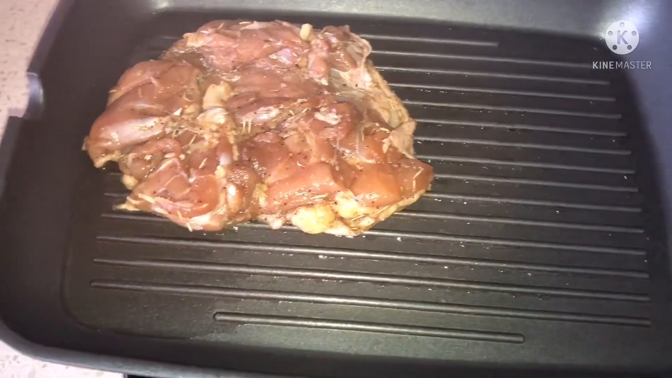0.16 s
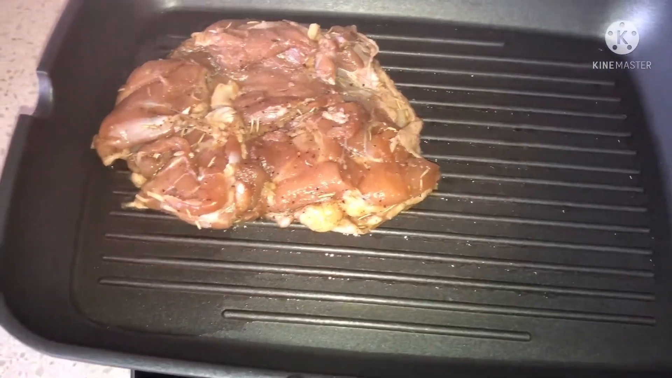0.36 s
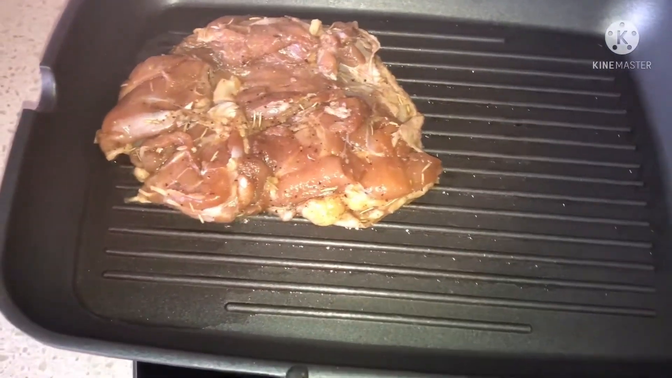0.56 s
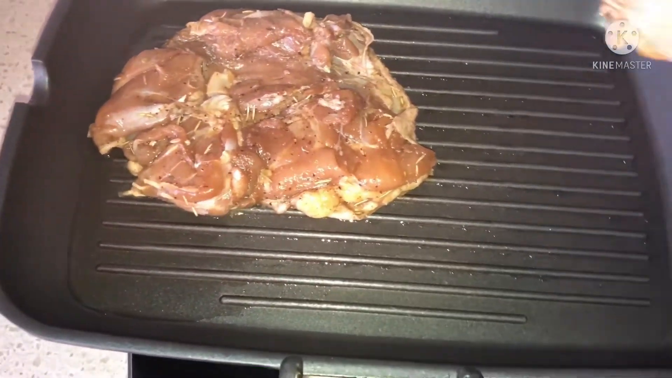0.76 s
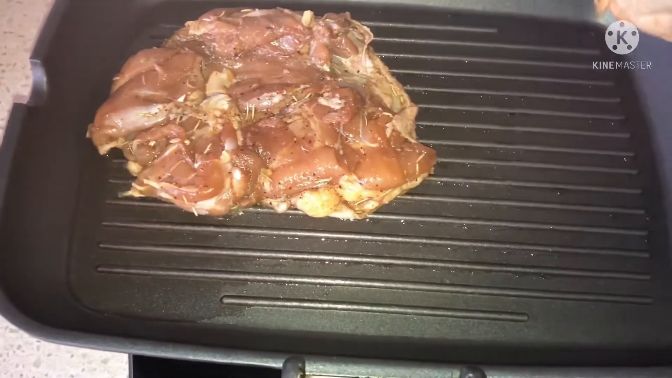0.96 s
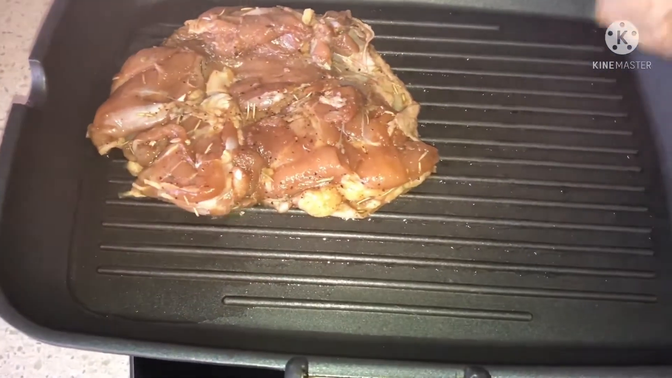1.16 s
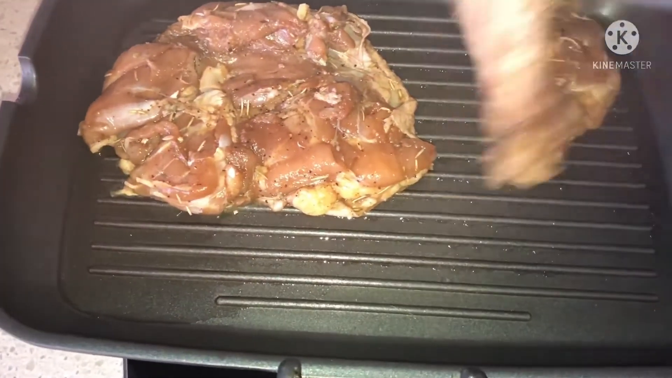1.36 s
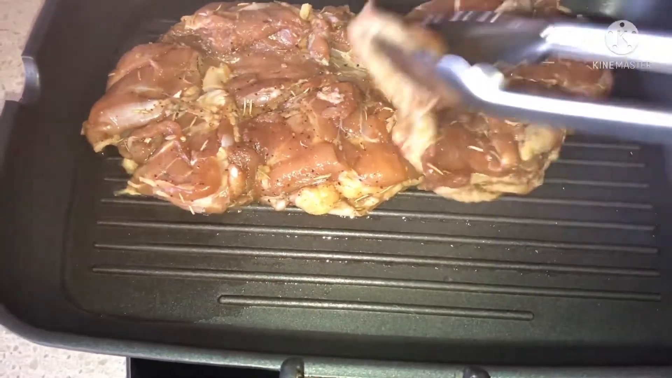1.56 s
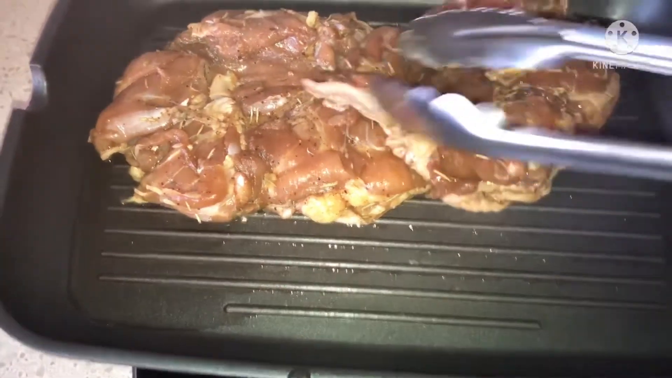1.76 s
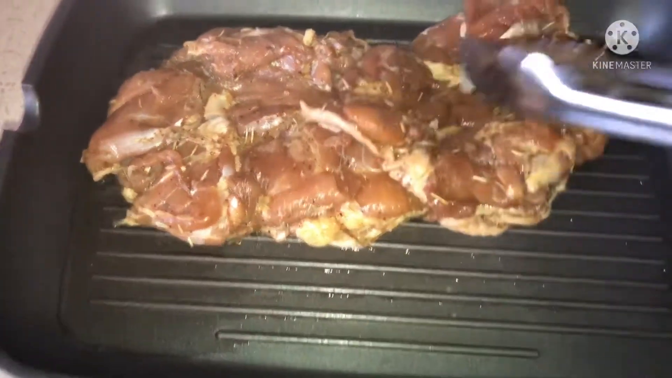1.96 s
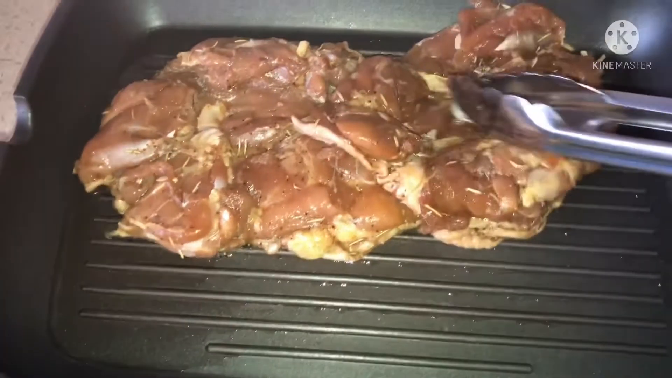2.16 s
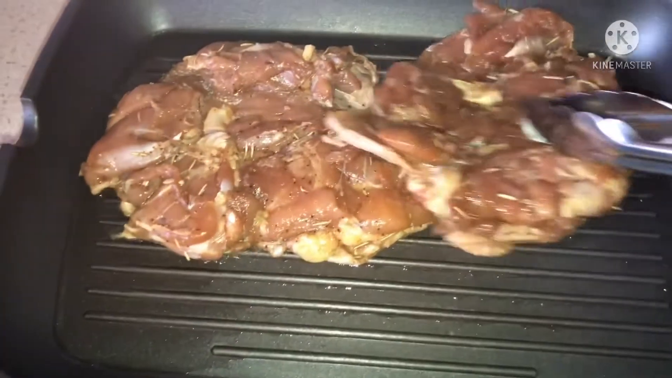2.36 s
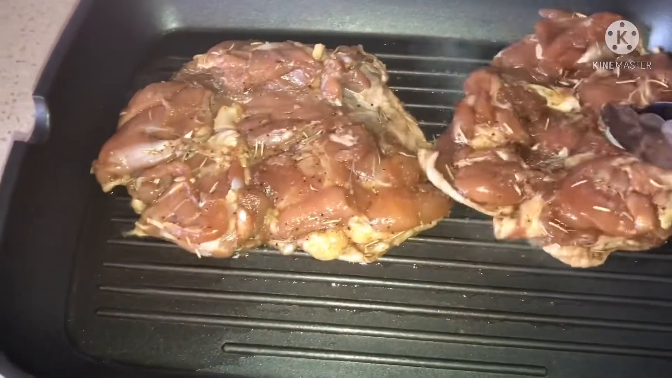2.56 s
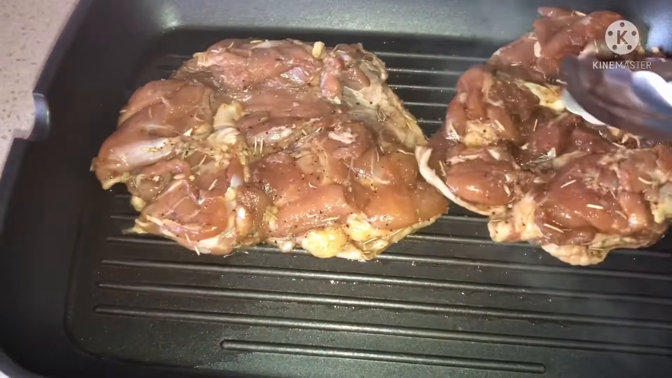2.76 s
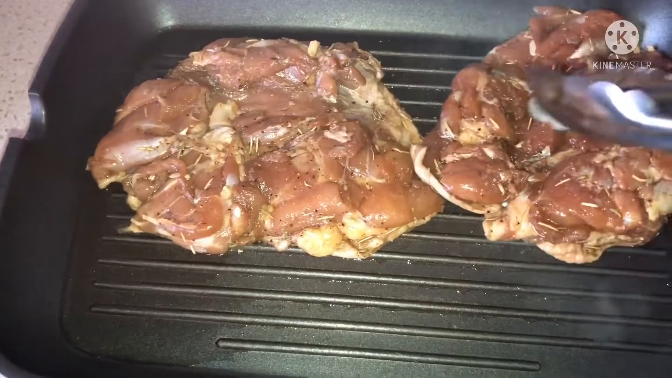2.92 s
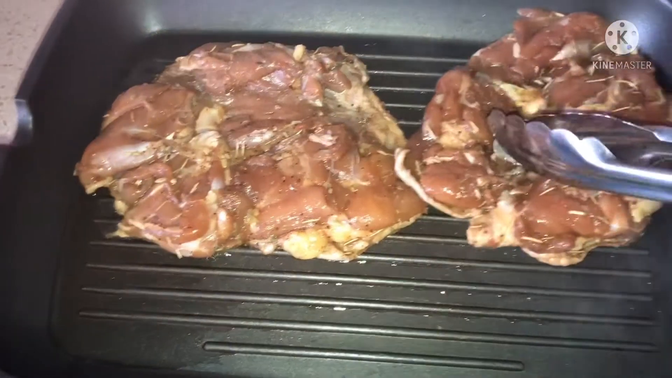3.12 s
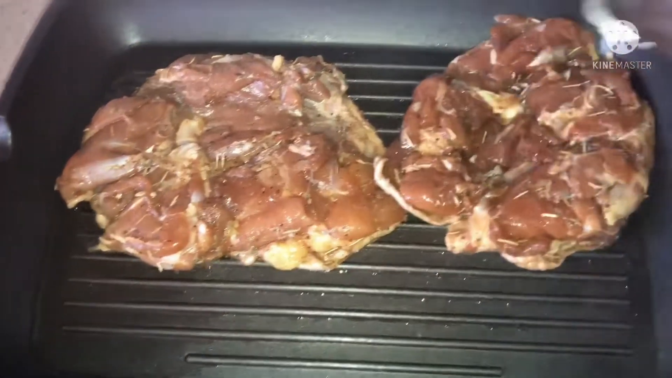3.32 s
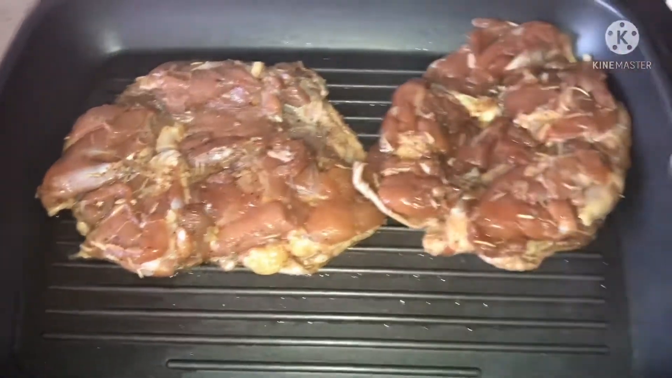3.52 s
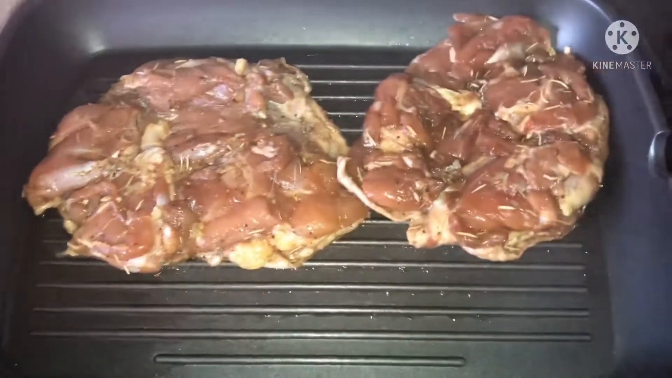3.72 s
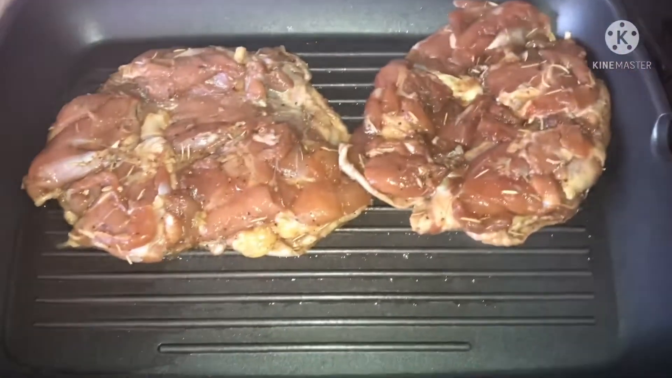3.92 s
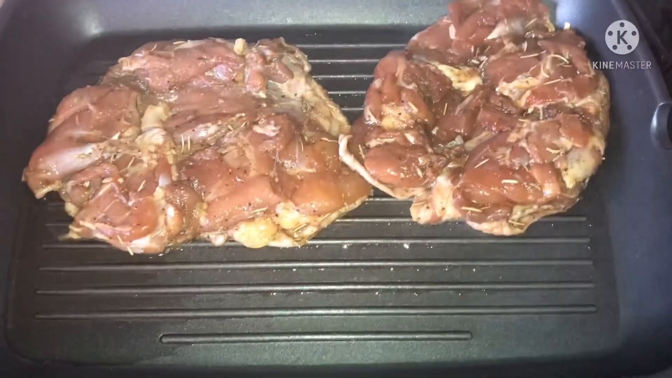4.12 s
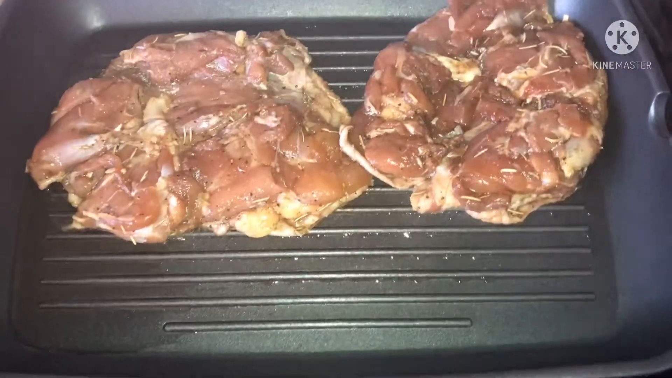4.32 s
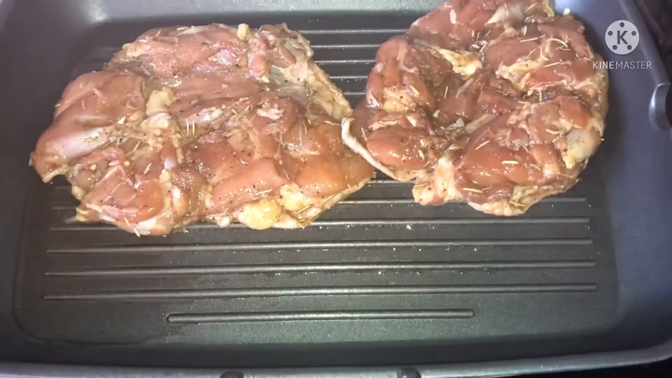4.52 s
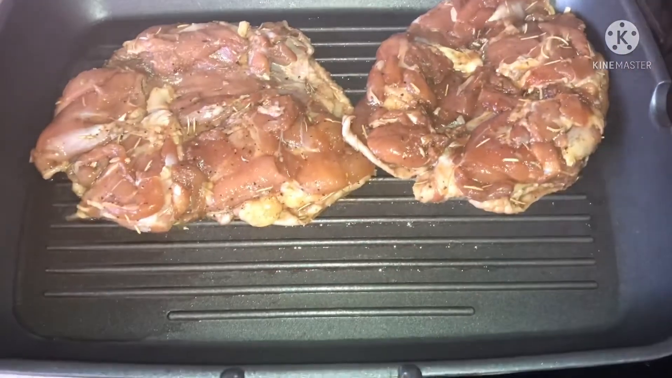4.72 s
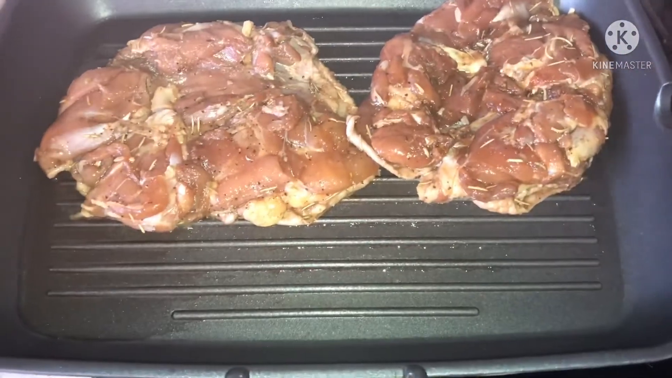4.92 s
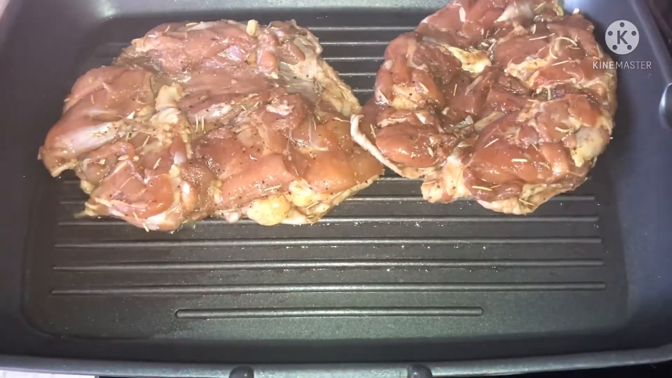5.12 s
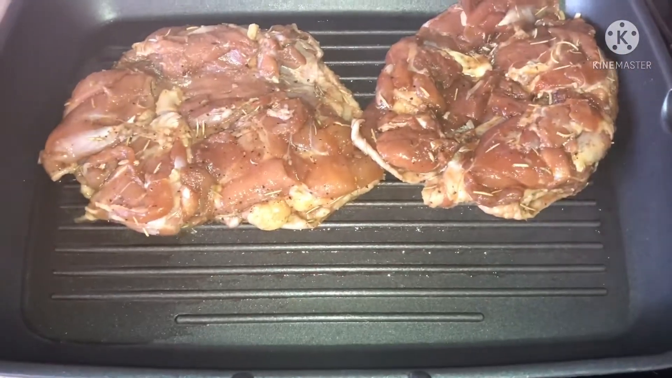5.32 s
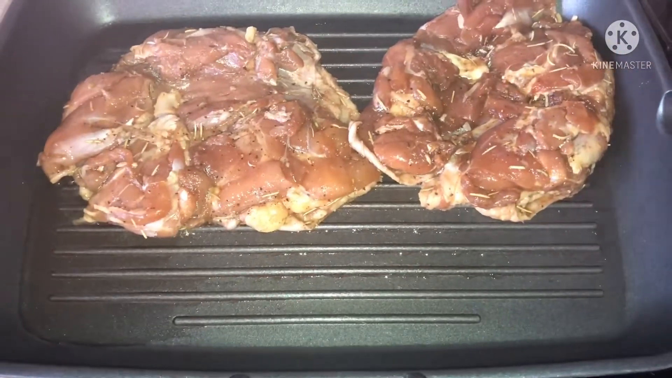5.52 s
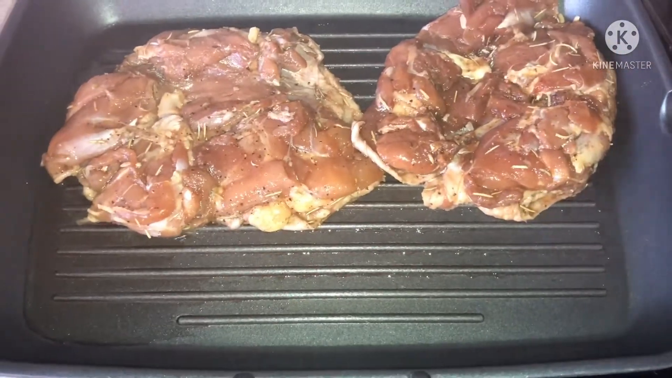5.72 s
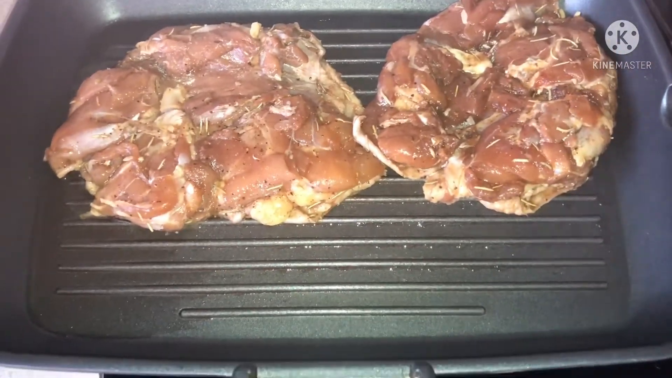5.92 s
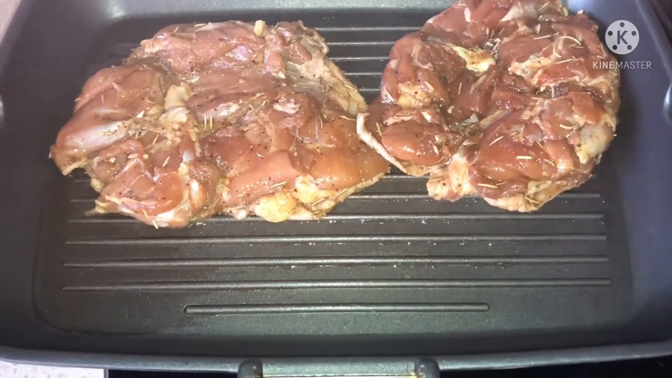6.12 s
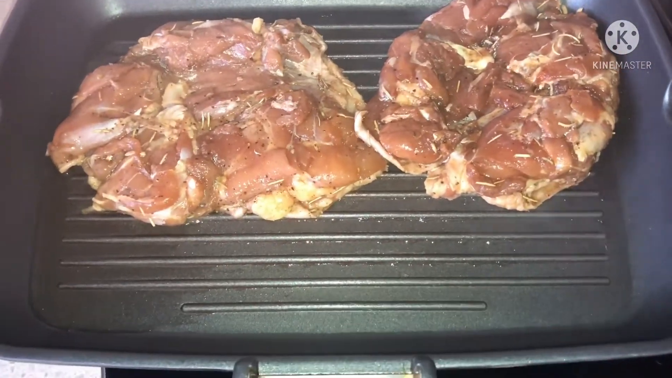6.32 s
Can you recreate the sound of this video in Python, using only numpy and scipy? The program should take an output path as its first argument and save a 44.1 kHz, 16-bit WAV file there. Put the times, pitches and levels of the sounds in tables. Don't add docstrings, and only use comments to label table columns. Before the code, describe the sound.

Meat fries on a ridged metal pan in a kitchen, a bright, dense fizz dotted with sharp fat pops. After about a second another piece is laid in and the sizzle swells markedly, with louder snaps. It surges again midway, then eases slightly but keeps spitting. A low extractor fan hums faintly behind. The microphone is very close above the pan.

```python
import sys
import numpy as np
from scipy import signal
from scipy.fft import rfft, irfft, next_fast_len
from scipy.io import wavfile
from scipy.ndimage import uniform_filter1d, minimum_filter1d

SR = 44100
rng = np.random.default_rng(int(sys.argv[2]) if len(sys.argv) > 2 else 0)


def invert_db(level):
    return 10 ** (np.asarray(level, dtype=float) / 20)


def wav_record(signal):
    frames = np.transpose(np.atleast_2d(signal))
    bounded = np.clip(frames, -1, 1)
    quanta = np.round(bounded * 32767).astype(np.int16)
    wavfile.write(sys.argv[1], SR, quanta)


N = 281358

# pitch_hz, level_db [dB per Hz]
FAN_AIR = [(15, -45), (35, -25), (58, -5.5), (90, -6.5), (170, -9), (200, -12), (400, -10), (700, -10.5),
           (1100, -23.5), (2000, -60)]
# pitch_hz, width_hz, level_db
FAN_TONES = [
    (72.4, 12, -53),
    (115.6, 22, -48.5),
    (155.5, 7.6, -54),
    (223, 13, -62),
    (490, 5, -55),
]
# start_s, peak_db
KNOCK = [
    (0.545, -25),
]
# pitch_hz, level_db, t60_s
KNOCK_MODES = [
    (614, 4, 0.067),
    (758, -1, 0.3),
    (1106, -10, .07),
]
# start_s, peak_db (above 0 the limiter ducks), pitch_hz
POPS = [(0.1128, -5, 10700), (0.212, -1, 9600), (0.2188, 1, 10600), (0.3343, -7, 11200),
        (0.3611, -6, 12100), (0.369, -8, 10700), (0.4678, -4, 6500), (0.476, -2.5, 9500),
        (0.6473, -5, 11200), (0.8542, -9, 10700), (0.875, -4.5, 7600), (0.9892, -2, 11900),
        (1.0716, -3.5, 7460), (1.0763, -2, 11200), (1.1292, -3, 9700), (1.405, 5, 9800),
        (2.0558, 11, 11600), (2.5626, 8, 10400), (2.9495, 6.5, 8400), (3.9392, 6, 8400), (4.0954, 4, 10700),
        (4.2593, 1, 12500), (4.459, 2, 9400), (4.5659, -1, 8500), (4.9333, 5, 10600), (5.265, 0, 6500),
        (5.6655, 3, 8000), (5.9877, 10, 9400), (6.232, 1, 8800), (6.2656, 3.5, 9300)]
# pitch_hz, level_db [dB per Hz]
STEAM = [(250, -28), (450, -25), (600, -12.5), (900, -3), (1400, -2.5), (2400, -3), (3500, -6.5),
         (4500, -9), (5600, -5), (7000, -2), (8800, -1), (11000, -4.5), (13000, -4), (15700, -3.5)]
# pitch_hz, width_hz, level_db (negative: dead spots between modes)
PAN_MODES = [(492, 8, 12), (520, 18, -6), (603.5, 39, 8.5), (672, 29, -9.5), (768, 16, 3), (804, 16, 4.5),
             (830, 33, -4.5), (1138.4, 37, 9.5), (1278, 92, 5), (1944, 260, 5), (2157, 46, -7.5),
             (2620, 720, 5.5), (2830, 120, -1), (4410, 390, -1.5)]
# start_s, vigour_db, looseness [how freely pan and thin spray sound around the fizz]
BOIL = [(0, -26, 1.2), (.35, -24.5, -1.1), (.68, -25.5, 0.24), (1.0, -25, -.8), (1.26, -25, 0),
        (1.33, -20.5, -.5), (1.47, -17, -0.62), (1.9, -17.5, 1.9), (2.2, -18, 1.7), (2.45, -17, 0.3),
        (2.8, -14.5, 0.36), (3.2, -17, 0.96), (3.55, -17, -0.086), (3.85, -18, -0.21), (4.12, -19, 0.19),
        (4.7, -19, -0.67), (5.5, -20, -0.39), (6.38, -19.5, 0.35)]
# level_db [against the vigour], loose_db [per looseness], lag_s, fade_db [per s]
REGIONS = [
    (-17, 0.5, .35, 0),
    (-7, 1, 0.032, 0),
    (-10.5, -0.2, .01, 0),
    (-0.72, 0, .002, 0),
    (.3, 0.4, .01, 0.56),
]
# start_s, length_s, pitch_hz, gain_db
POCKETS = [(.06, 0.18, 3180, 7.5), (0.0, 1.5, 4300, 4.5), (0, 1.05, 1180, 3), (1.3, .45, 11000, 2),
           (1.34, 0.26, 2400, 5.5), (1.5, .3, 2260, 2), (1.2, 1.3, 1700, 4), (3, 0.61, 6250, 3),
           (2.6, 2.1, 813, 4), (3.85, 0.94, 2350, 3), (3.2, 0.27, 1150, 3), (5, 1.4, 3170, 3)]
# start_s, low_hz
SIDE_HISS = [(.29, 5700), (.685, 7600), (1.265, 14500), (1.36, 6900), (2.26, 13800), (2.89, 5440),
             (2.89, 14400), (3.145, 6900), (3.145, 14500), (3.24, 9700), (3.305, 10400), (3.305, 4030),
             (3.355, 7600), (3.4, 9000), (3.4, 12500), (3.79, 10360), (4.35, 8300), (4.35, 9100),
             (5.35, 9000), (5.535, 8300)]
EDGE_HZ = 15760


def evened(x):
    return x / np.sqrt(np.mean(x ** 2) + 1e-20)


def read(points, hz):
    f, value = np.transpose(points)
    return np.interp(np.log(hz + 1), np.log(f + 1), value)


def resonance(hz, centre_hz, width_hz):
    return 1 / (1 + (2 * (hz - centre_hz) / width_hz) ** 2)


def drift(per_s):
    knots = rng.standard_normal(4000)
    return evened(np.interp(np.arange(N) * per_s / SR, np.arange(4000), knots))


def colour(x, hz, gain_db):
    log_gain = np.log(invert_db(np.maximum(gain_db - gain_db.max(), -80)))
    mirrored = np.r_[log_gain, log_gain[-2:0:-1]]
    phase = -signal.hilbert(mirrored).imag[:len(hz)]
    return signal.oaconvolve(x, irfft(np.exp(log_gain + 1j * phase)))[:N]


def fan():
    hz = np.fft.rfftfreq(N, 1 / SR)
    air = irfft(rfft(rng.standard_normal(N)) * invert_db(read(FAN_AIR, hz)), N)
    out = invert_db(-42.5) * evened(air)
    for pitch_hz, width_hz, level_db in FAN_TONES:
        tone = irfft(rfft(rng.standard_normal(N)) * resonance(hz, pitch_hz, width_hz), N)
        out += invert_db(level_db) * evened(tone)
    return out


def kitchen(x, wet_db, t60):
    at = np.arange(60, 6000, 20) + rng.integers(0, 20, (3, 297))
    echoes = rng.choice([-1., 1.], at.shape) * invert_db(-60 * at / SR / t60)
    taps = np.zeros((3, 6100))
    np.put_along_axis(taps, at, echoes, 1)
    turns = np.arange(N) / SR * 9 + np.arange(3)[:, None] / 3
    spots = np.cos(2 * np.pi * turns) * np.sqrt(2 / 3)
    tails = signal.oaconvolve(x * spots, taps / np.linalg.norm(taps[0]), axes=1)[:, :N]
    return x + invert_db(wet_db) * tails.sum(0)


def knock():
    (start_s, peak_db), = KNOCK
    t = np.maximum(np.arange(N) / SR - start_s, 0)
    ring = sum(invert_db(db - 60 * t / t60) * np.sin(2 * np.pi * hz * t) for hz, db, t60 in KNOCK_MODES)
    return invert_db(peak_db - 3) * ring * (1 - np.exp(-t / .003))


def burst(hz, cycles):
    turns = np.arange(200) / SR * hz
    wave = np.sin(2 * np.pi * turns) * np.exp(-turns / cycles) * (1 - np.exp(-turns / 0.45))
    return wave / abs(wave).max()


def spits():
    per_s, rise_db_per_s = 26, 1.1
    when, size, pitch = rng.random((200, 3)).T
    start_s = (np.arange(200) + when) / per_s
    peak_db = -15 + 7.5 * size + rise_db_per_s * start_s
    pitch_hz = 8000 + 5000 * pitch
    rows = np.transpose([start_s, peak_db, pitch_hz])
    return rows[(start_s > 1e-3) & (start_s < N / SR)]


def pops():
    out = np.zeros(N + 200)
    for start_s, peak_db, hz in [*POPS, *spits()]:
        pop = burst(hz * 0.89, 1.9) + 0.85 * burst(hz * 1.43, 2.1) + 0.34 * burst(hz * 0.55, 1.0)
        pop += 0.16 * burst(2900, 2.0)
        out[round(start_s * SR) - 4:][:200] += invert_db(peak_db) * pop / abs(pop).max()
    return kitchen(out[:N], wet_db=-9, t60=0.027)


def bubbles(per_s, spread_db, cycles, clump_db):
    chance, size, kind = rng.random(N), rng.exponential(1, N), rng.integers(0, 24, N)
    bursting = chance < per_s / SR * invert_db(clump_db * drift(60))
    train = invert_db(spread_db * np.minimum(size, 4.5)) * bursting
    out = np.zeros(N)
    for k, hz in enumerate(np.linspace(700, 17000, 24)):
        grain = burst(hz, cycles)
        out += signal.oaconvolve(train * (kind == k), grain / np.linalg.norm(grain))[:N]
    return evened(out)


def cracks():
    size = invert_db(3.6 * np.minimum(rng.exponential(1, N), 4))
    return evened(size * (rng.random(N) < 900 / SR) * rng.choice([-1, 1], N))


def steam():
    sharp = bubbles(per_s=5000, spread_db=2.5, cycles=1.68, clump_db=1.16) + invert_db(-5.5) * cracks()
    hiss = evened(rng.standard_normal(N))
    drive = kitchen(sharp, wet_db=-2, t60=0.072) + invert_db(4.5) * hiss
    drive *= invert_db(0.26 * drift(45) + 0.11 * drift(11))
    hz = np.fft.rfftfreq(16384, 1 / SR)
    pan_db = sum(db * resonance(hz, f, width) for f, width, db in PAN_MODES)
    return colour(drive, hz, read(STEAM, hz) + pan_db)


def sizzle():
    start_s, vigour_db, loose = np.transpose(BOIL)
    spectrum, hz = rfft(steam()), np.fft.rfftfreq(N, 1 / SR)
    above = [1 / (1 + (edge / (hz + 1)) ** 8) for edge in (0, 1000, 3300, 5400, 11000)] + [0]
    out, t = np.zeros(N), np.arange(N) / SR
    for k, (db, loose_db, lag_s, fade_db) in enumerate(REGIONS):
        region = irfft(spectrum * (above[k] - above[k + 1]) * (hz < EDGE_HZ), N)
        level_db = np.interp(t, start_s, vigour_db + loose_db * loose)
        keep = np.exp(-1 / (lag_s * SR + 1))
        late_db = level_db[0] + signal.lfilter([1 - keep], [1, -keep], level_db - level_db[0])
        out += invert_db(late_db + db - fade_db * t + 0.22 + 0.3 * drift(30)) * evened(region)
    return out


def pockets(x):
    q, edge_s = 11, 0.064
    fast = 2 * next_fast_len(N // 2 + 1)
    spectrum, hz = rfft(x, fast), np.fft.rfftfreq(fast, 1 / SR)
    t, out = np.arange(N) / SR, x
    for start_s, length_s, pitch_hz, gain_db in POCKETS:
        rise, fall = t - start_s + edge_s, start_s + length_s - t
        shape = np.clip(np.minimum(rise, fall) / edge_s, 0, 1)
        band = irfft(spectrum * resonance(hz, pitch_hz, pitch_hz / q), fast)[:N]
        out = out + (invert_db(gain_db) - 1) * shape * band
    return out


def scene():
    return np.tile(fan() + knock() + pops() + pockets(sizzle()), (2, 1))


def side_hiss(mono):
    width_hz = 1270
    side, hz = np.zeros(N), np.fft.rfftfreq(2048, 1 / SR)
    for start_s, low_hz in SIDE_HISS:
        at = round(start_s * SR) - 1024
        size = abs(rfft(mono[at:at + 2048])) * (hz > low_hz) * (hz < low_hz + width_hz)
        side[at:at + 2048] += irfft(size * np.exp(2j * np.pi * rng.random(1025))) * np.hanning(2048)
    return invert_db(-3.5) * np.array([side, -side])


def limiter(dry):
    over_db = np.maximum(20 * np.log10(abs(dry[0]) + 1e-9) - .3, 0)
    held_db = -minimum_filter1d(-over_db, size=441, origin=220)
    held_db = uniform_filter1d(held_db, size=12)
    return np.clip(dry / invert_db(0.8 * held_db), -.92, .92)


def roll_off(x):
    return signal.sosfilt(signal.butter(12, 16890, fs=SR, output="sos"), x)


def record(dry):
    lowpass = signal.firwin(1023, EDGE_HZ, window=("kaiser", 9), fs=SR)
    band = signal.oaconvolve(limiter(dry), lowpass[None], "same")
    return roll_off(band + side_hiss(band[0]))


dry = scene()
out = record(dry)
wav_record(out)
```